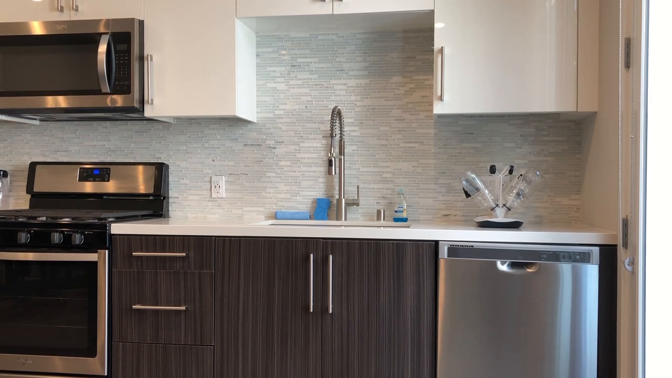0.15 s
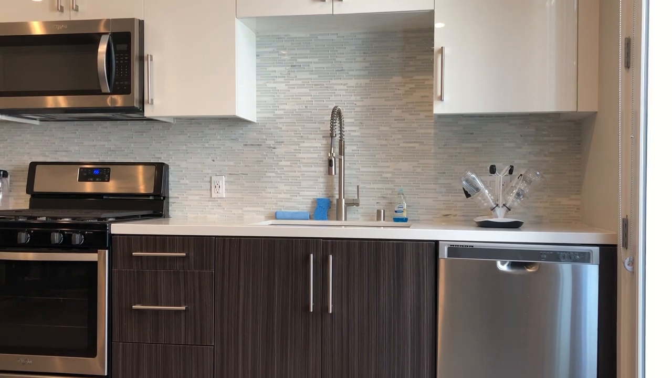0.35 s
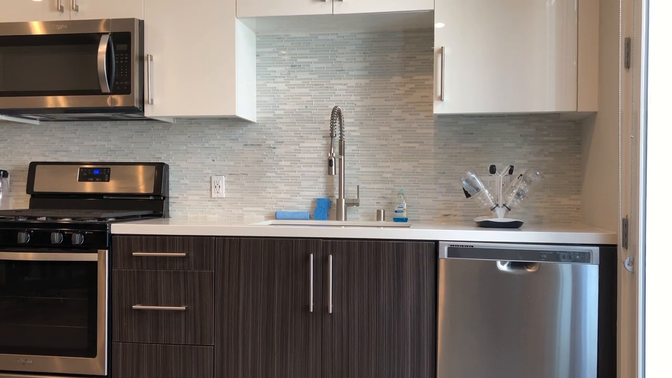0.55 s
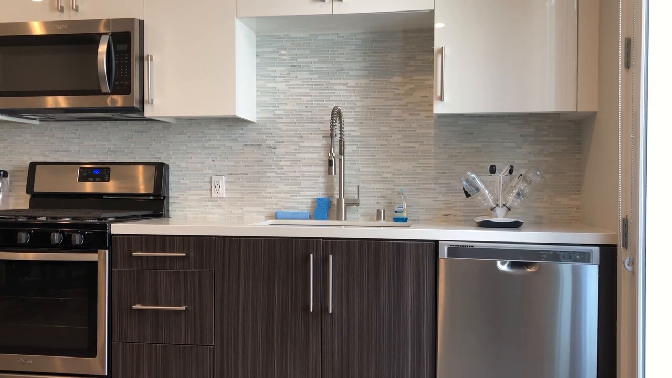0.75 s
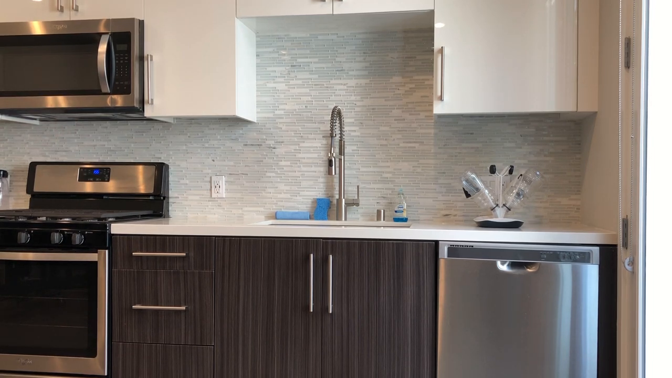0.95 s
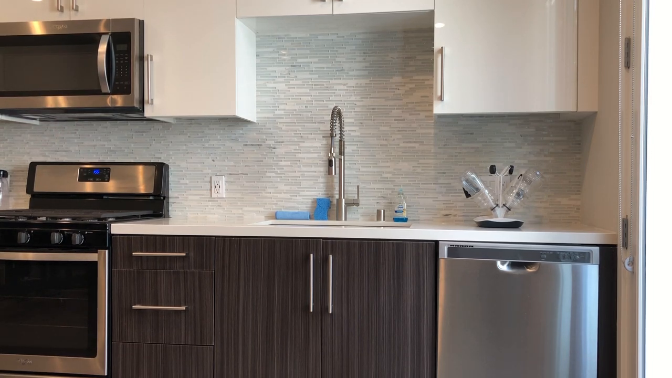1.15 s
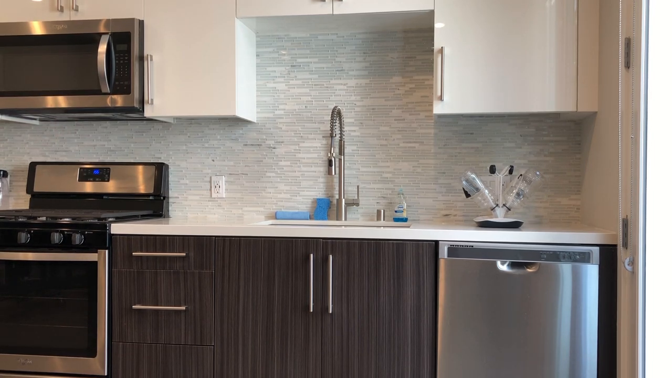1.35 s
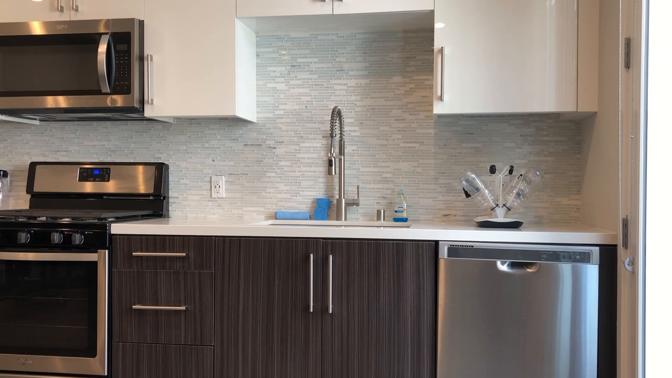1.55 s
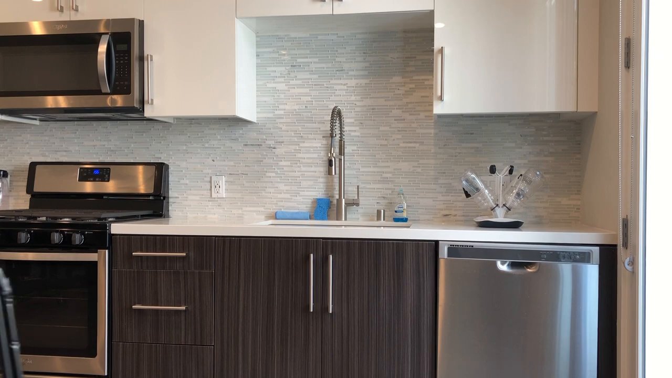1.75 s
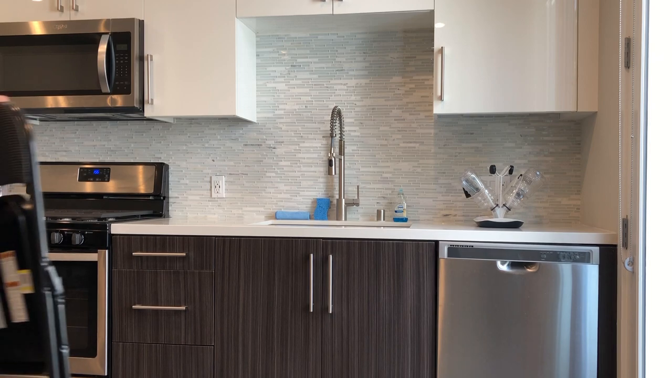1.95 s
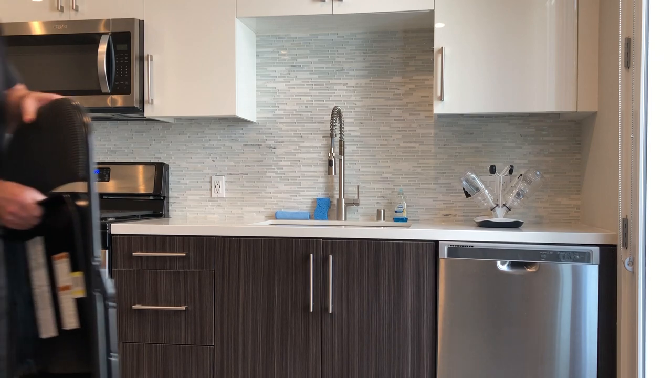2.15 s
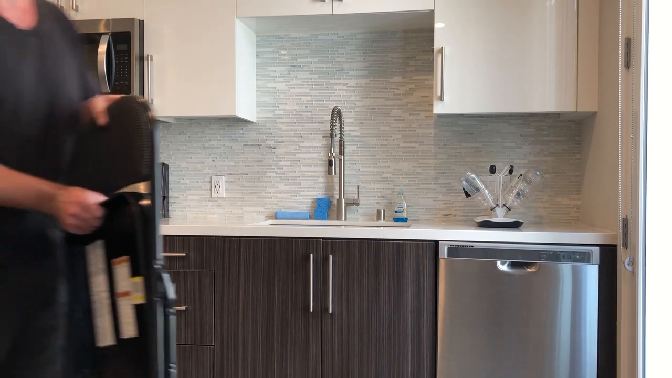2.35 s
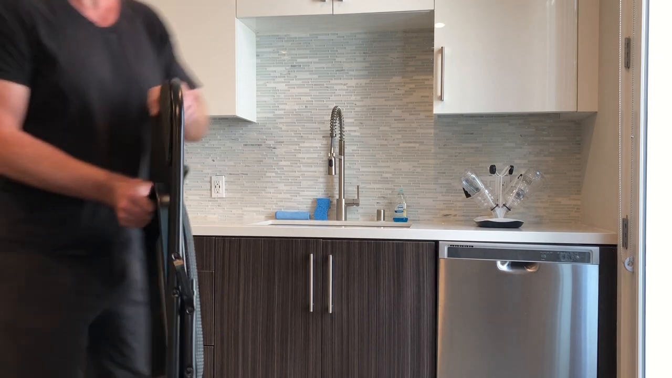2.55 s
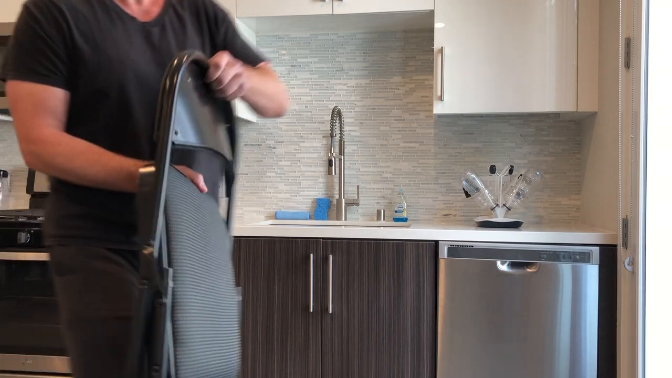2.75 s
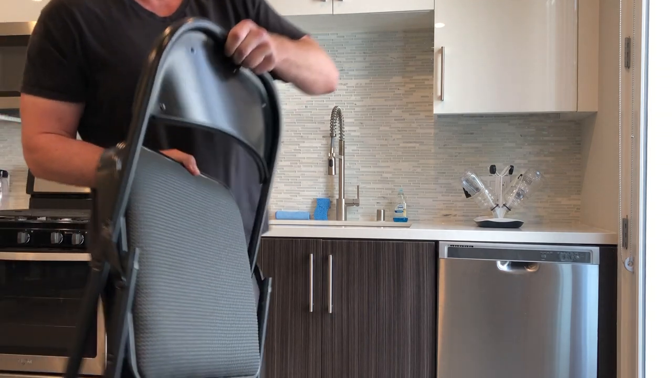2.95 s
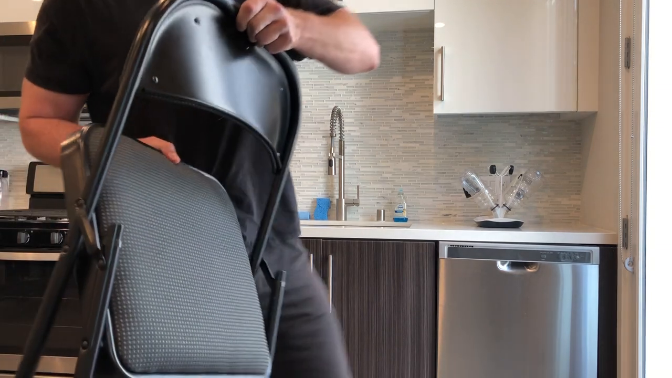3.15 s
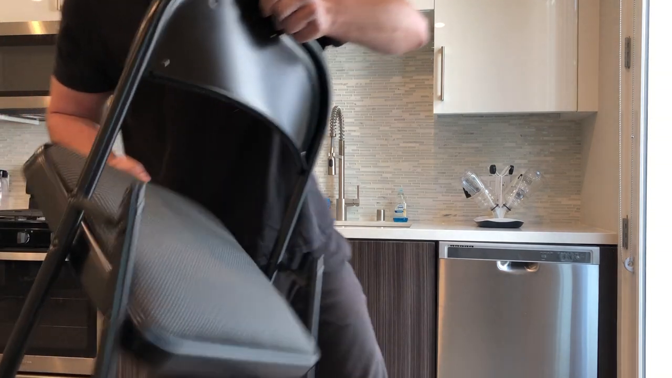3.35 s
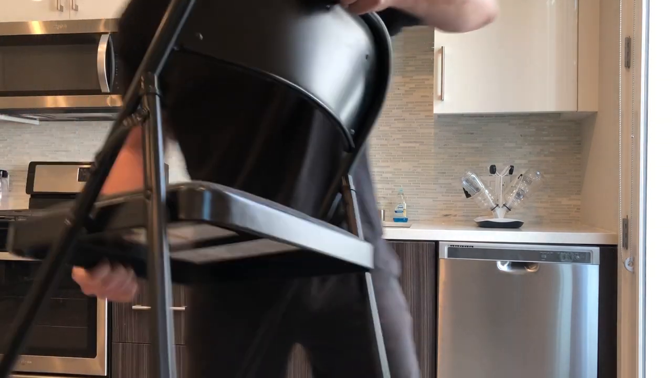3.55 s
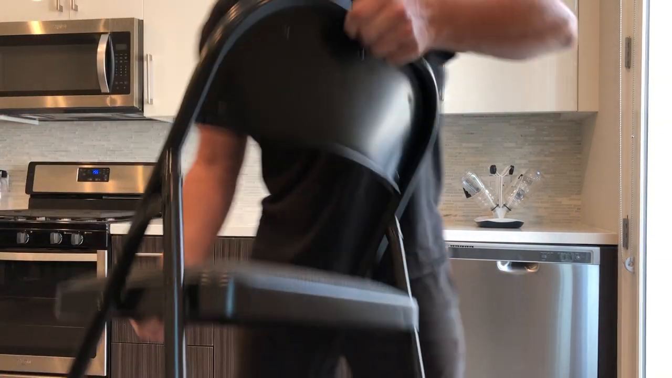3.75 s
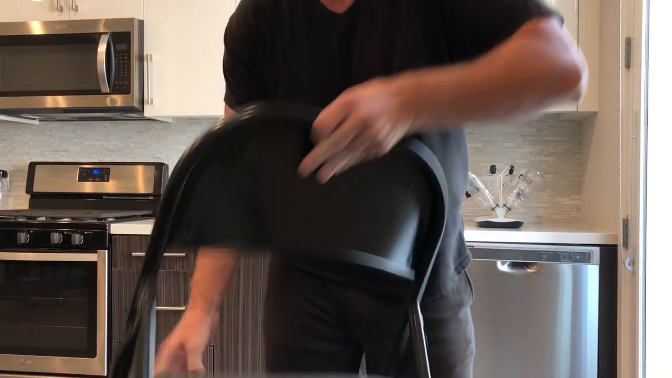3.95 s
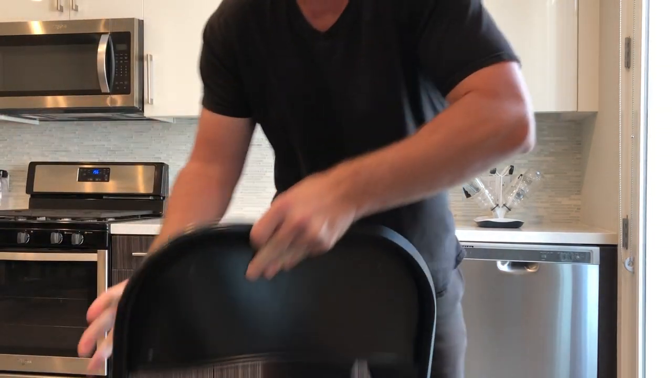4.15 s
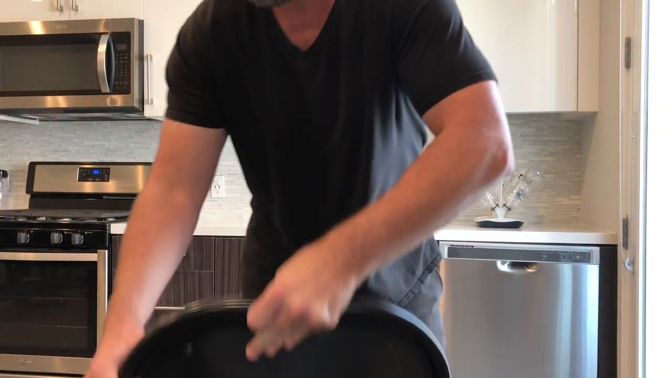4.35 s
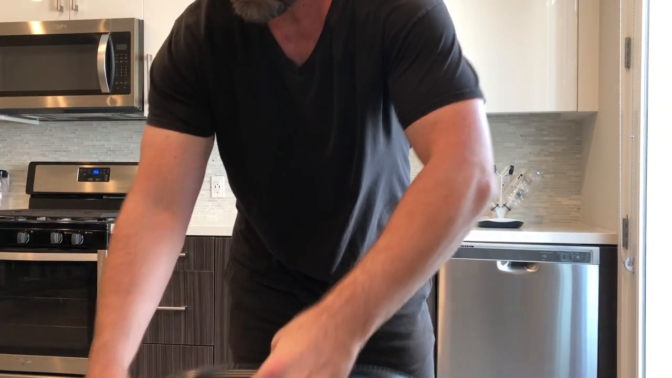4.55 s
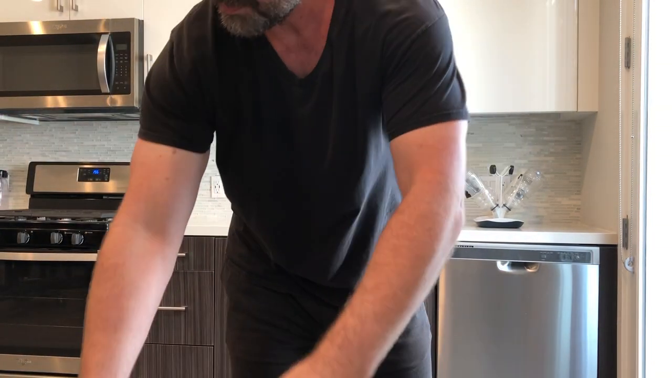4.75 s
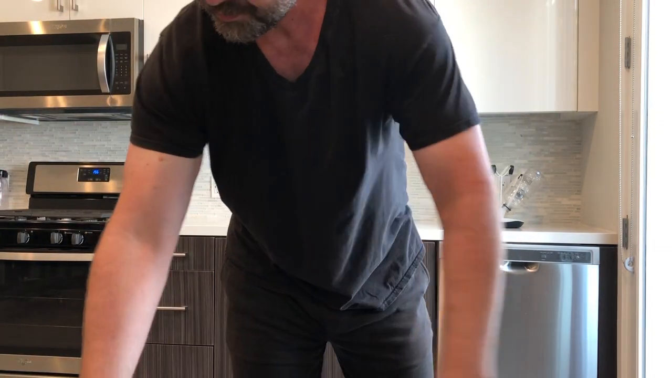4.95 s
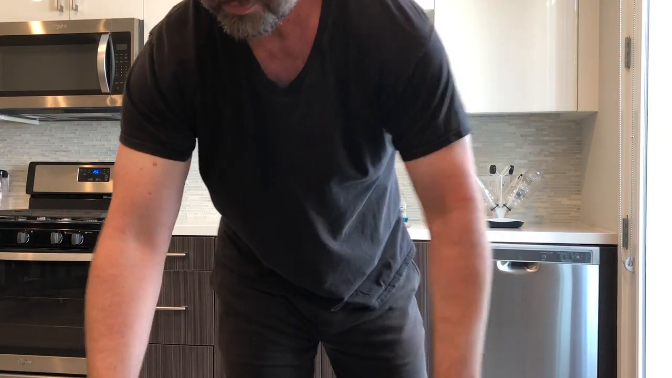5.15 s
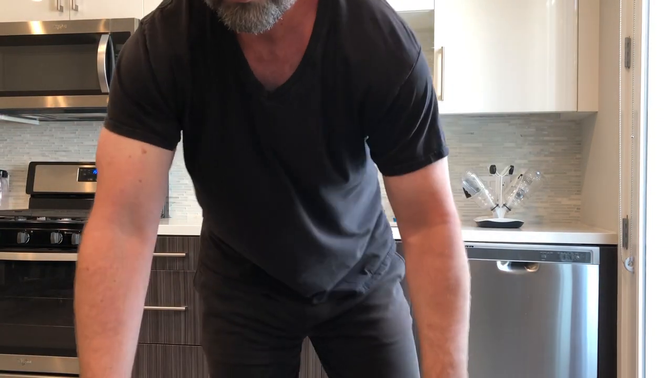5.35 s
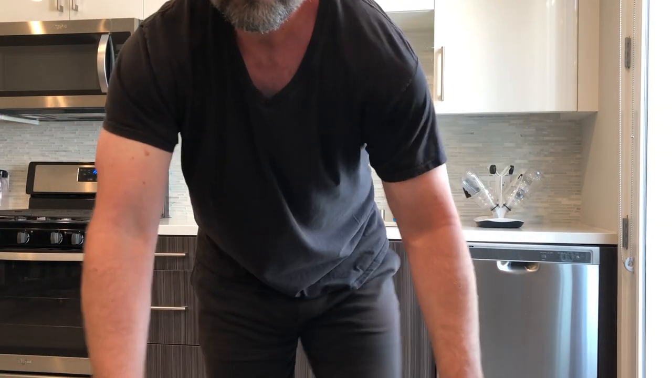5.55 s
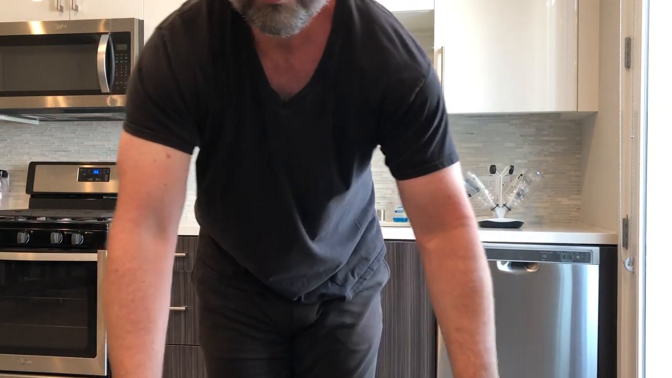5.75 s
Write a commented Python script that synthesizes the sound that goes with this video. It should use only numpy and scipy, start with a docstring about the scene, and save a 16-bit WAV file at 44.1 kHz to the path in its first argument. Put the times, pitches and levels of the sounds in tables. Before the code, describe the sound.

A steady, very quiet low hum with slight hiss lies under everything in a hard, echoing kitchen. From 0 to 1.5 s soft footsteps tap and roll on the floor, strongest around 0.7-0.9 s with a shoe scuff; they fade to near silence by 2.3 s. From 2.4 to 3.4 s come faint metallic ticks and light hinge rubbing. Small clicks at 3.53 and 3.6 s lead straight into the one dominant event at 3.65 s: a hard, bright steel clack with a short hollow seat thud and low rumble, its echo dying over almost a second. A small clunk follows at 4.0 s and a tiny tick at 4.3 s. Chair legs land at about 4.6, 4.75-4.85 and 4.95-5.05 s, far quieter, dull-edged knocks mixed with gritty, bright scrapes. A faint tick at 5.3 s, a double knock at 5.6 s, then soft rubbing to the end. The sound is centred and fairly close.

```python
"""Footsteps on a hard, echoing kitchen floor over the quiet hum of the home; then a steel folding chair
is handled, its seat clacks loudly on its stop, and its legs are set on the floor amid scuffs and hinge ticks.
Contacts are coloured noise bursts, frame and seat are banks of decaying sines, rubbing is shaped noise,
rumble is band-passed noise, and the room is a decaying noise tail. Both channels are alike."""
import sys
import numpy as np
from scipy import signal
from scipy.io import wavfile
from scipy.ndimage import uniform_filter1d

SR = 44100
rng = np.random.default_rng(int(sys.argv[2]) if len(sys.argv) > 2 else 0)


def digitize_waveform(pressure):
    """Quantize a signal to 16-bit integers and store it at the path in sys.argv[1].

    Rows of a 2-D input are taken as channels; values are limited to [-1, 1].
    """
    field = np.atleast_2d(pressure).T
    bounded = np.clip(field, -1, 1)
    quanta = np.round(bounded * 32767).astype(np.int16)
    wavfile.write(sys.argv[1], SR, quanta)


def amplitude_ratio(level_db):
    """Convert a level in decibels to the matching linear amplitude (field) ratio."""
    exponent = np.asarray(level_db, float) / 20
    return 10 ** exponent


N = 255339


def evened(x):
    """Scales to rms 1."""
    return x / np.sqrt(np.mean(x ** 2) + 1e-20)


def read(points, hz):
    """Interpolates a table of (hz, value) on a log-frequency axis."""
    point_hz, value = np.transpose(points)
    return np.interp(np.log(hz + 1), np.log(point_hz + 1), value)


def add(mix, start_s, sound):
    """Mixes a sound in at start_s."""
    part = mix[max(round(start_s * SR), 0):][:len(sound)]
    part += sound[:len(part)]


def shaped(level_db):
    """Noise whose short-time spectrum follows level_db (bins x frames, hop 128)."""
    z = rng.standard_normal(level_db.shape) + 1j * rng.standard_normal(level_db.shape)
    return signal.istft(z * amplitude_ratio(level_db), nperseg=512, noverlap=384)[1]


def swell_db(t, peak_s, peak_db, rise_s, fall_s):
    """Straight decibel climb to the peak and fall from it."""
    swing_db = 30  # climbed in rise_s, lost in fall_s
    return peak_db - swing_db * np.maximum((peak_s - t) / max(rise_s, .004), (t - peak_s) / max(fall_s, .004))


# hum spectrum: [hz, relative_db_per_hz]
HUM_SPECTRUM = [(12, -48), (20, -7), (124, -1), (165, -4.5), (297, 2), (404, -6.5), (913, -13.5),
                (1020, -8.5), (1110, -15), (1210, -10), (1350, -18.5), (2180, -19.5), (2660, -24.5),
                (15200, -34), (16500, -40.5)]


def hum():
    """Steady appliance and street rumble with the microphone's hiss, drifting in patches."""
    hum_rms_db, drift_db = -60.5, 2.0
    frames, hz = N // 512 + 5, np.fft.rfftfreq(2048, 1 / SR)
    real, imaginary, patches = rng.standard_normal((frames, len(hz), 3)).T
    patches = uniform_filter1d(patches, size=16, axis=0)
    patches = evened(uniform_filter1d(patches, size=10, axis=1))
    z = (real + 1j * imaginary) * amplitude_ratio(read(HUM_SPECTRUM, hz)[:, None] + drift_db * patches)
    noise = signal.istft(z, nperseg=2048, noverlap=1536)[1][:N]
    return amplitude_ratio(hum_rms_db) * evened(noise)


# contact bands thud, clank, tick, sizzle: centres [hz]
BAND_HZ = [200, 1800, 5600, 12000]
# same bands: widths [hz]
BAND_WIDTH_HZ = [400, 2000, 4000, 7000]


def contact(clank_db, thud_db, tick_db, sizzle_db, contact_ms, rise, shoulder_db):
    """Rattle of touching faces, and the push all directions add up to; rise as a share of contact time."""
    chatter_db, push_thud_db = 1.8, -3.5
    band_db = clank_db + np.array([thud_db, 0, tick_db, sizzle_db])  # bands are re clank
    per_hz_db = band_db - 10 * np.log10(np.array(BAND_WIDTH_HZ) * 2 / SR)
    points = [(50, per_hz_db[0] - 3.5), *zip(BAND_HZ, per_hz_db)]
    points += [(3200, per_hz_db[1] + shoulder_db), (3800, per_hz_db[2] + 1.5)]
    points.sort()
    log_gain = np.log(amplitude_ratio(read(points, abs(np.fft.fftfreq(4096, 1 / SR)))))
    minimum_phase = np.exp(np.conj(signal.hilbert(log_gain)))
    colour = np.fft.ifft(minimum_phase).real[:2048]

    contact_ms = max(contact_ms, .3)
    u = np.arange(8192) / SR * 1000 / contact_ms  # time in contact times
    low = signal.butter(2, 500, "lowpass", fs=SR, output="sos")
    high = signal.butter(2, 500, "highpass", fs=SR, output="sos")
    quick, slow = rng.standard_normal((2, len(u)))
    quick *= amplitude_ratio(chatter_db * rng.standard_normal(len(u) // 16).repeat(16))  # faces chatter in bursts
    treble = signal.sosfilt(high, quick) * np.exp(-u) * np.minimum(u / rise, 1)
    swell = u / 5.5 * np.exp(1 - u / 1.18)  # thud swells and fades more slowly than treble
    rattle = treble + signal.sosfilt(low, slow) * swell
    push = colour * np.sqrt(contact_ms * SR / 2000)
    return signal.fftconvolve(rattle, colour), push + amplitude_ratio(push_thud_db) * signal.sosfilt(low, push)


# footfalls on the hard floor: [start_s, slap_db, thud_db re slap, tick_db re slap, contact_ms]
FOOTFALLS = [(0.0, -44, -5, -9.5, 5.3), (0.0456, -59, -3, -2, 31), (0.4444, -53, -5.5, -9.5, 46),
             (0.734, -46.5, 12, -7.5, 11.7), (0.7858, -42, -3, -31, 16), (0.852, -43.5, -29, -18, 8.5),
             (0.8924, -53, -8, 2, 12), (1.1087, -53.5, 10.5, -12, 21), (1.4299, -49.5, -4, -11, 19.5),
             (1.9573, -63, -4, -3.5, 20), (2.2194, -75.5, 14, -15, 23), (2.309, -95, 15, -22, 11)]


def steps():
    """Soles roll onto the floor without ringing; returns direct sound and what fills the room."""
    sizzle_re_tick_db = -3.5
    direct, spread = np.zeros((2, N))
    for start_s, slap_db, thud_db, tick_db, contact_ms in FOOTFALLS:
        sizzle_db = tick_db + sizzle_re_tick_db
        hit, push = contact(slap_db, thud_db, tick_db, sizzle_db, contact_ms, rise=1.25, shoulder_db=-10)
        add(direct, start_s - .004, hit)
        add(spread, start_s, push)
    return direct, spread


# decay of the room's echoes: [hz, t60_s]
ROOM_DECAY = [(60, 0.13), (160, 0.35), (420, 0.77), (1100, 0.85), (2900, 0.9), (5500, 0.92), (8000, 0.68),
              (11000, 0.49), (16000, 0.36)]


def kitchen(x, count=3):
    """Dense echoes that die by band; slightly different tails take turns as the source moves."""
    turns_per_s = 7
    t, hz = np.arange(500) * 128 / SR, np.fft.rfftfreq(512, 1 / SR)
    turn, out = np.arange(N) / SR * turns_per_s % count, np.zeros(N)
    for k in range(count):
        tail = shaped(-60 * t / read(ROOM_DECAY, hz)[:, None])
        tail *= np.clip(np.arange(len(tail)) / SR / 0.0071 - .25, 0, 1)  # first walls answer after a few ms
        away = abs((turn - k + count / 2) % count - count / 2)
        window = np.cos(np.pi / 2 * np.minimum(away, 1))
        out += signal.fftconvolve(x * window, tail / np.linalg.norm(tail))[:N]
    return out


# friction spectrum: [hz, relative_db_per_hz]
FRICTION_SPECTRUM = [(60, -23.5), (150, -7.5), (400, -16), (1200, -12.5), (2500, -17), (3600, -20.5),
                     (4100, -25.5), (4800, -21.5), (9500, -19.5), (11500, -29), (14000, -22.5),
                     (16000, -30)]
# strokes of soles, hinge, cloth and chair feet: [peak_s, peak_db, rise_s, fall_s, treble_tilt_db]
RUB_STROKES = [(0.734, -35, 0.015, 0.2, -3), (0.908, -35.5, 0.27, 0.45, -11.5), (1.132, -52, .15, 0.32, -9),
               (3.23, -42, 0.033, 0.2, -16), (3.531, -37, 0.011, .015, 16), (3.638, -35, 0.049, .01, -17),
               (4.352, -43.5, .17, 0.62, -9), (4.61, -29, 0.011, 0.12, 5), (4.76, -34.5, .03, 0.25, 6),
               (4.959, -27.5, 0.0097, 0.13, 7), (5.061, -26.5, .03, 0.11, 1), (5.116, -44, .1, 0.46, 4),
               (5.575, -39, 0.048, 0.33, 3), (5.612, -36, 0.027, 0.34, 2), (5.79, -34, 0.46, .1, -4.5)]
# band that sings while they rub in turn: [until_s, pitch_hz, width_hz, level_db over the friction noise]
SINGING_BANDS = [(2.1, 4770, 300, 9.5), (3.9, 2040, 288, 10), (4.578, 3960, 267, 12.5),
                 (5.47, 2860, 490, 2), (5.9, 4040, 110, 17)]


def rubbing():
    """Friction noise that catches unevenly; each stroke tilts its treble and one band sings."""
    t, hz = np.arange(N // 128 + 5) * 128 / SR, np.fft.rfftfreq(512, 1 / SR)[:, None]
    treble = np.clip(np.log2((hz + 1) / 3000) / 2.8, 0, 1)
    catches_db = 2.0 * evened(uniform_filter1d(rng.standard_normal(len(t)), size=4))
    base_db = read(FRICTION_SPECTRUM, hz) - 16
    power = 0
    for peak_s, peak_db, rise_s, fall_s, tilt_db in RUB_STROKES:
        level_db = swell_db(t, peak_s, peak_db, rise_s, fall_s)
        power = power + amplitude_ratio(2 * level_db) * amplitude_ratio(2 * treble * tilt_db)
    ends_s = [row[0] for row in SINGING_BANDS[:-1]]
    _, sing_hz, width_hz, sing_db = np.array(SINGING_BANDS)[np.searchsorted(ends_s, t)].T
    song_db = sing_db * np.exp(-((hz - sing_hz) / width_hz) ** 2)
    return shaped(base_db + 10 * np.log10(power + 1e-20) + song_db + catches_db)[:N]


def ringing(modes, struck_hz, focus_db, octaves, catch_db, length=1):
    """One strike's decaying sines: modes near struck_hz ring most, each caught a little harder or softer."""
    detune = .012  # grip and floor contact shift each mode a little from strike to strike
    t = np.arange(SR) / SR
    hz, level_db, t60_s = np.transpose(modes)[:, :, None]
    near_db = focus_db * np.exp(-(np.log2(hz / struck_hz) / octaves) ** 2)
    uneven_db = catch_db * rng.standard_normal(hz.shape)
    hz = hz * (1 + detune * rng.standard_normal(hz.shape))
    fade_db = 60 * t / np.maximum(t60_s * length, .02)
    return (amplitude_ratio(level_db + near_db + uneven_db - fade_db) * np.sin(2 * np.pi * hz * t)).sum(axis=0)


# modes of the steel frame, also rung by chair(): [pitch_hz, relative_db, t60_s at length 1]
TUBE_MODES = [(780, -8, .1), (1235, -9, .12), (1300, -8, .1), (1650, -6, .14), (1715, -5, .22),
              (1785, -6, .14), (1885, -6, .22), (1935, -6, .16), (2055, -7, .12), (2330, -7, .07),
              (2560, -8, .12), (2745, -4, .12), (2950, -4, .16), (3150, -5, .05), (4060, -6, .25),
              (4170, -6, .5), (4700, -6, .1), (5100, -4, .14), (5480, -5, .1), (6430, -3, .1),
              (7270, -3, .14), (8500, -3, .09), (9400, -3, .08), (9900, -2, .08), (11500, -2, .07),
              (12200, -1, .08), (13400, -3, .05), (14200, -2, .05)]


def handling():
    """Friction is heard as it is and also keeps the tubes faintly singing."""
    rub_ring_db = -49.5
    rub = rubbing()
    tubes = ringing(TUBE_MODES, 3500, focus_db=7.0, octaves=0.37, catch_db=0.5, length=0.3)
    return rub + amplitude_ratio(rub_ring_db) * signal.fftconvolve(rub, tubes)[:N]


# low rumble around steps, swings and blows: [peak_s, peak_db, fall_s, centre_hz]
RUMBLE_LUMPS = [(0.76, -46, 0.23, 150), (0.924, -46, 0.17, 96), (1.169, -55, 0.16, 105),
                (3.305, -53, 0.57, 98), (3.49, -52, 0.083, 100), (3.69, -31, 0.16, 110),
                (3.799, -62, 0.56, 80), (4.39, -54, 0.38, 49), (4.612, -47.5, 0.41, 127),
                (4.841, -53, 0.32, 68), (4.973, -47, 0.36, 85), (5.1, -55, 0.22, 75.2),
                (5.389, -55, .2, 99), (5.5, -56, 0.15, 47.4), (5.646, -63, 0.36, 80),
                (5.77, -52.5, .1, 100)]


def shudder():
    """Low lumpy noise, each lump around one broad resonance."""
    rise_s, width_factor = 0.086, 1.5  # width either side of the centre
    out, t = np.zeros(N), np.arange(SR) / SR - .3
    for peak_s, peak_db, fall_s, centre_hz in RUMBLE_LUMPS:
        edges_hz = [centre_hz / width_factor, centre_hz * width_factor]
        band = signal.butter(3, edges_hz, "bandpass", fs=SR, output="sos")
        level = uniform_filter1d(amplitude_ratio(swell_db(t, 0, peak_db, rise_s, fall_s)), size=800)
        add(out, peak_s + t[0], evened(signal.sosfilt(band, rng.standard_normal(SR))) * level)
    return out


# steel parts knock together: [start_s, clank_db, thud_db re clank, tick_db re clank, struck_hz that rings most]
STEEL_BLOWS = [(2.4427, -67.5, -8, 2, 4700), (2.4886, -62.5, 10, -4, 1920), (2.5715, -52, -14, -5, 4870),
               (2.584, -59, -2, 5.5, 8500), (2.7702, -50.5, -27, 3, 12200), (3.183, -69, 9, 8.5, 11500),
               (3.2138, -52, -9, -28, 1880), (3.2306, -49, -11, -6, 11500), (3.317, -49.5, -9, -8.5, 14200),
               (3.3484, -67.5, -4, 9, 7300), (3.527, -41, -40, -6, 11500), (3.5976, -37, -26, -9, 2150),
               (3.6477, -8, -3.5, -4.5, 1900), (3.6661, -28, 7.5, -35, 1740),
               (4.005, -37.5, 0.5, -12, 1970), (4.3099, -53, -2, -10, 4260),
               (4.5192, -69.5, 5.5, -1.5, 6400), (5.31, -52, -1, -9, 4020)]
# capped legs land on the floor: [start_s, clank_db, thud_db re clank, tick_db re clank, struck_hz]
LEG_LANDINGS = [(4.5881, -41.5, 2.5, -11.5, 2900), (4.597, -33.5, 2, -7, 9400),
                (4.745, -40.5, -1, -4, 13400), (4.754, -35.5, 2.5, -10.5, 9400), (4.7893, -47, 9, -23, 780),
                (4.8392, -41, 4, -7.5, 8500), (4.9557, -34.5, 9, -12.5, 9640),
                (4.972, -39.5, 6.5, -14, 3240), (5.0567, -35.5, 2.5, -10.5, 8500),
                (5.6001, -37.5, 2, -11, 2880), (5.6233, -35, -4.5, -9, 9400)]


def chair():
    """Each blow's push rings the tubes; returns direct sound and what fills the room."""
    blow_ms, blow_rise = 5.14, 0.4  # rises as shares of contact time
    landing_ms, landing_rise = 8.9, 0.31
    tubes_db, ring_direct_db = -45.5, -1
    sizzle_re_tick_db, hard_db, soft_dulls = 0.04, -36.5, 0.26  # sizzle dB lost per dB under hard_db
    direct, spread = np.zeros((2, N))
    rows = [(*row, blow_ms, blow_rise) for row in STEEL_BLOWS]
    rows += [(*row, landing_ms, landing_rise) for row in LEG_LANDINGS]
    for start_s, clank_db, thud_db, tick_db, struck_hz, contact_ms, rise in rows:
        sizzle_db = tick_db + sizzle_re_tick_db + soft_dulls * min(clank_db - hard_db, 0)
        hit, push = contact(clank_db, thud_db, tick_db, sizzle_db, contact_ms, rise, shoulder_db=-3.5)
        focus_db = 6 + 2.5 * np.log2(struck_hz / 1800)  # grows per octave
        tubes = ringing(TUBE_MODES, struck_hz, focus_db, octaves=.28, catch_db=2.)
        ring = signal.fftconvolve(push, amplitude_ratio(tubes_db) * tubes)
        add(direct, start_s - .001, hit)
        add(direct, start_s, amplitude_ratio(ring_direct_db) * ring)
        add(spread, start_s, push)
        add(spread, start_s, ring)
    return direct, spread


# modes of the padded pan on its legs: [pitch_hz, relative_db, t60_s at length 1]
SEAT_MODES = [(141, -2, .4), (205, -4, .55), (300, -7, .3), (371, -5, .35), (465, -5, .3), (560, -10, .15)]
# jolts that set it humming: [start_s, level_db, struck_hz that rings most, length factor on t60]
SEAT_JOLTS = [(3.656, -28.5, 156, 0.52), (3.6662, -17.5, 386, 0.14), (3.677, -23, 326, 0.59),
              (4.004, -45.5, 383, 0.79), (4.599, -37, 169, 1.15), (4.752, -49, 200, 2.8),
              (4.789, -43, 500, 0.33), (4.884, -44.5, 293, 1.2), (4.96, -37, 329, 0.19),
              (5.05, -36, 255, 0.44), (5.603, -46, 206, 4.1)]


def seat():
    """The pan hums after each jolt, longer when no hand damps it."""
    out = np.zeros(N)
    for start_s, level_db, struck_hz, length in SEAT_JOLTS:
        pan = ringing(SEAT_MODES, struck_hz, focus_db=12, octaves=0.24, catch_db=0.2, length=length)
        add(out, start_s, amplitude_ratio(level_db) * pan)
    return out


def scene():
    """All but rumble and hum lose their deepest bass (small radiators) and meet the room; channels alike."""
    chair_wet_db, steps_wet_db, seat_wet_db, rub_wet_db = -1.5, 0, -11.5, -15.5
    metal, metal_spread = chair()
    feet, feet_spread = steps()
    pan, rub = seat(), handling()
    spread = amplitude_ratio(chair_wet_db) * metal_spread + amplitude_ratio(steps_wet_db) * feet_spread
    wet = kitchen(spread + amplitude_ratio(seat_wet_db) * pan + amplitude_ratio(rub_wet_db) * rub)
    small = signal.butter(3, 85, "highpass", fs=SR, output="sos")
    mono = signal.sosfilt(small, metal + feet + pan + rub + wet) + shudder() + hum()
    return np.tile(mono, (2, 1))


def roll_off(x):
    """The treble ends steeply here."""
    return signal.sosfilt(signal.butter(12, 16950, fs=SR, output="sos"), x)


def record(dry):
    """Soft overload that rounds the loudest peak, then a band limit."""
    ceiling, edge_hz = 0.54, 16050
    soft = ceiling * np.tanh(dry / ceiling)
    band_limit = signal.firwin(511, edge_hz, window=("kaiser", 9), fs=SR)
    mix = signal.oaconvolve(soft, band_limit[None], "same")
    return roll_off(mix)


dry = scene()
out = record(dry)
digitize_waveform(out)
```